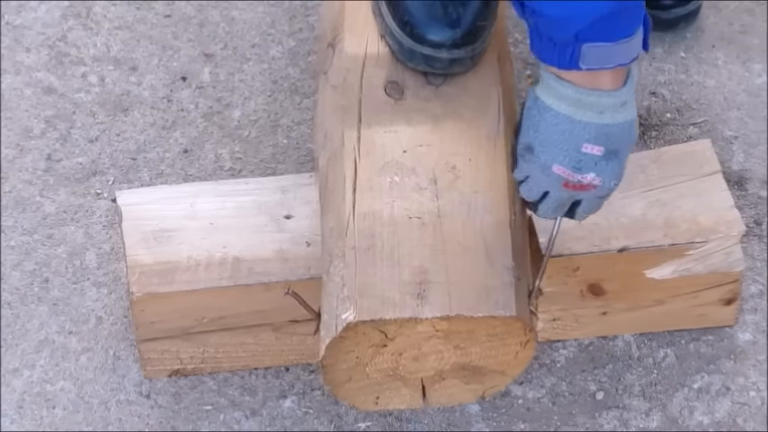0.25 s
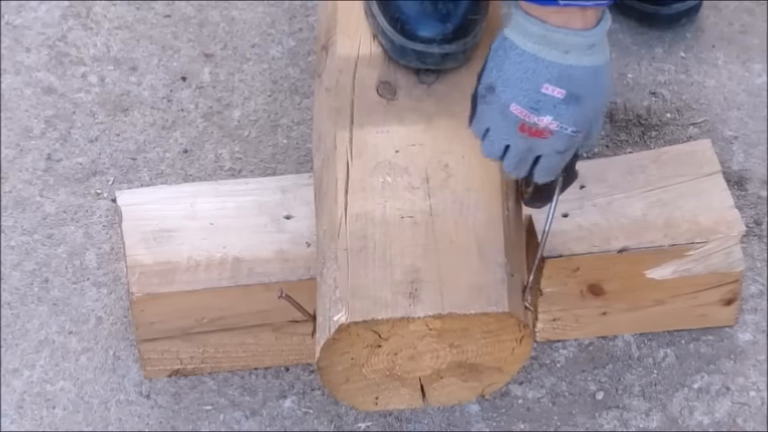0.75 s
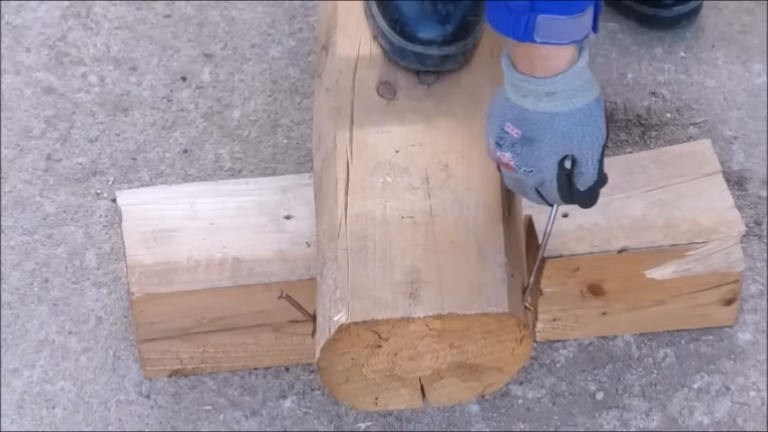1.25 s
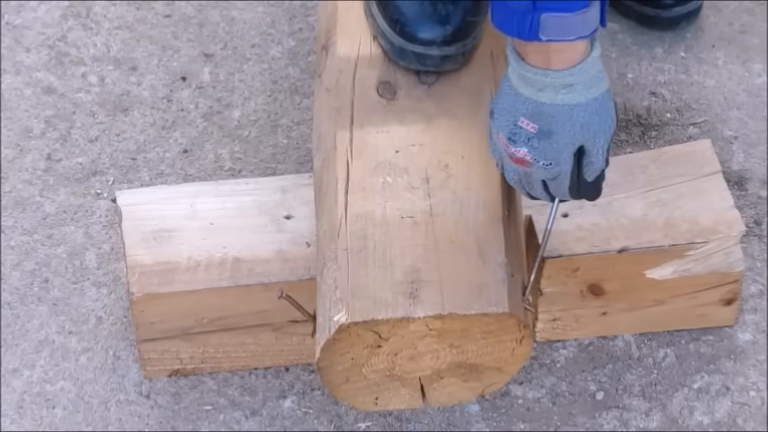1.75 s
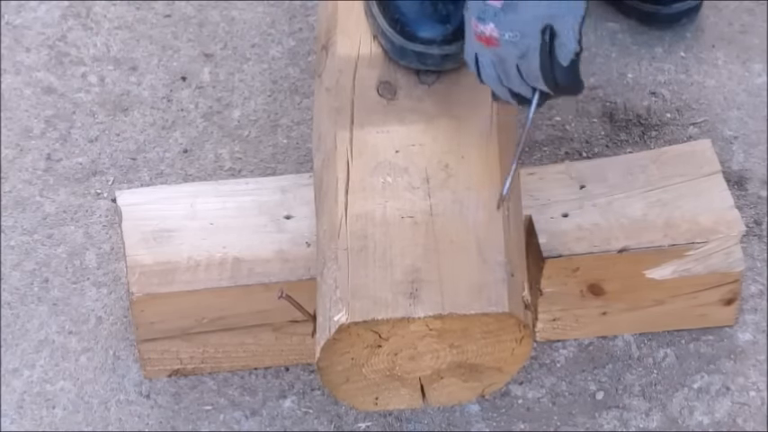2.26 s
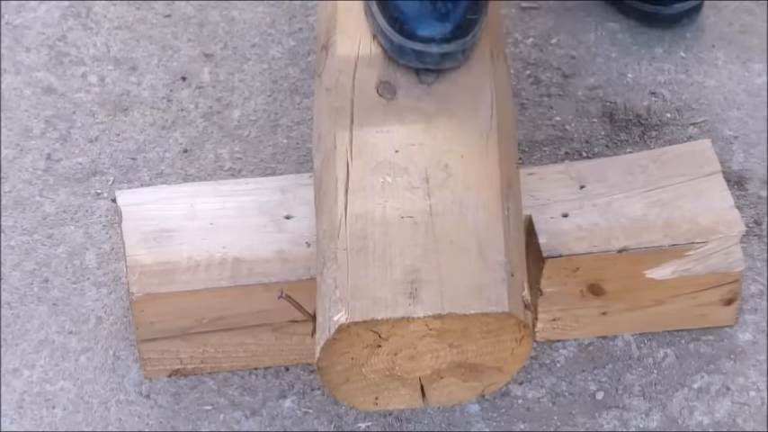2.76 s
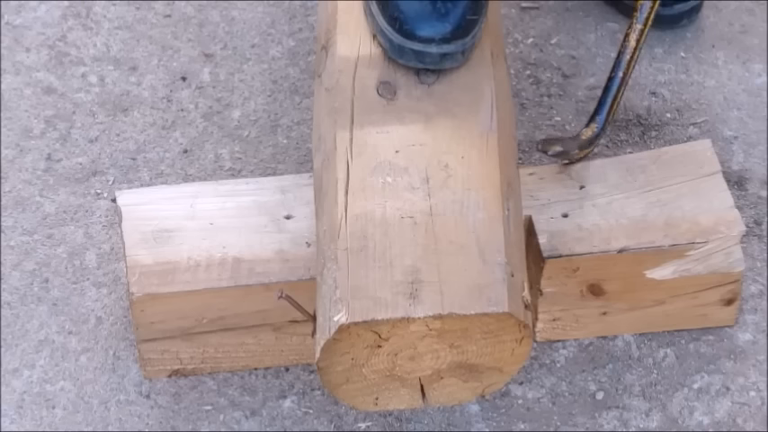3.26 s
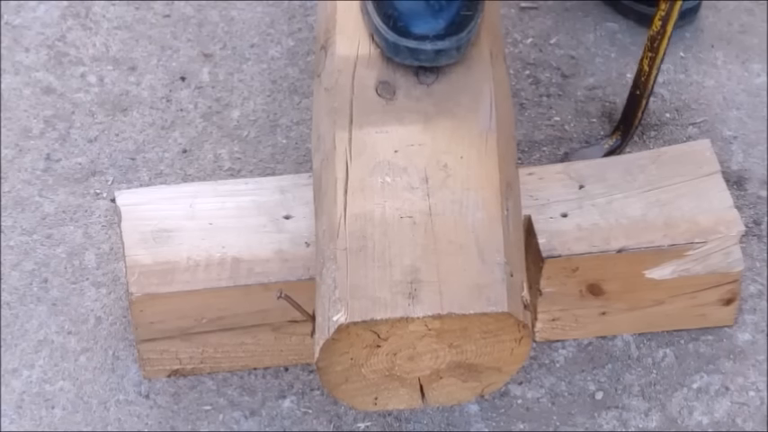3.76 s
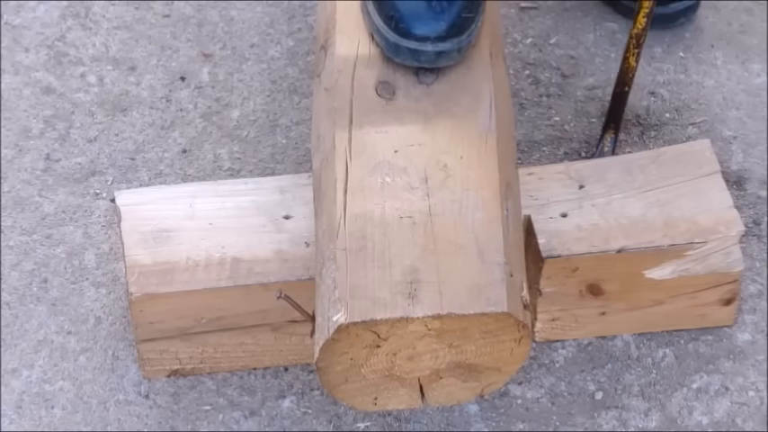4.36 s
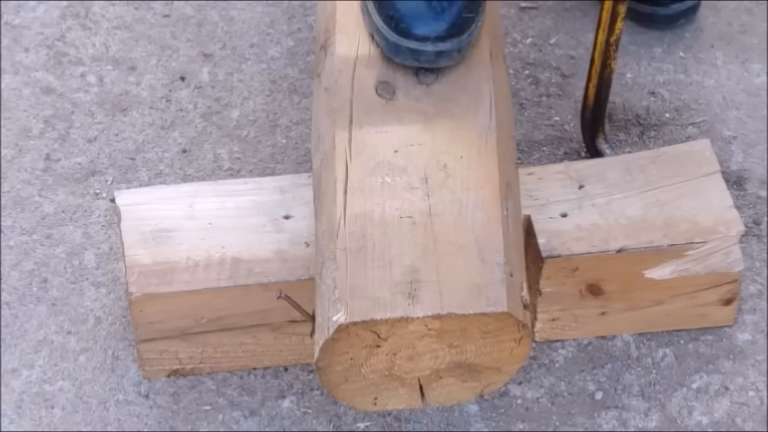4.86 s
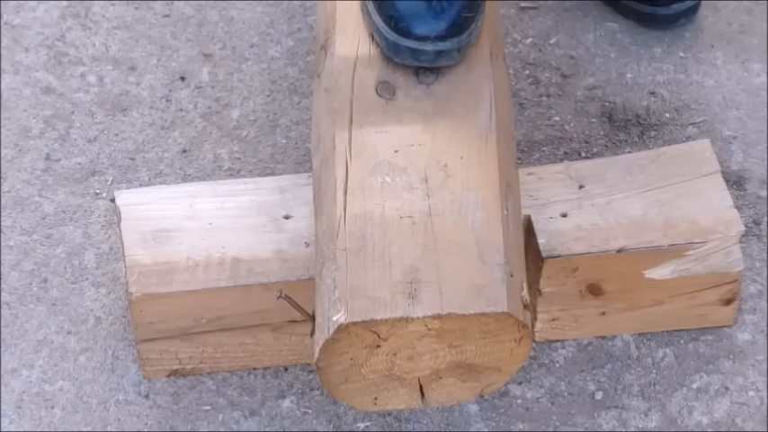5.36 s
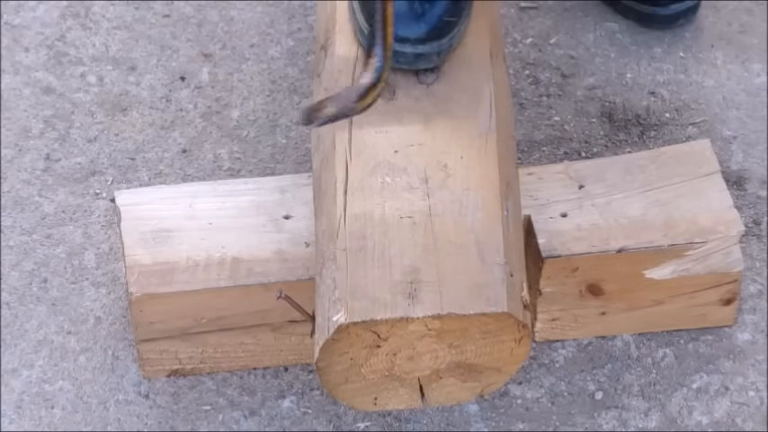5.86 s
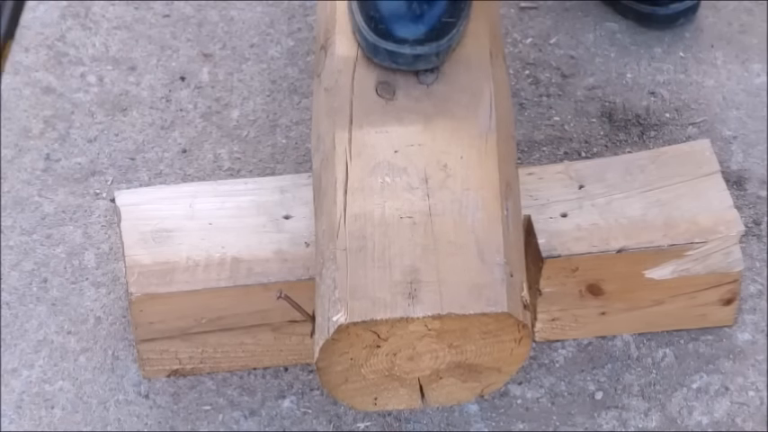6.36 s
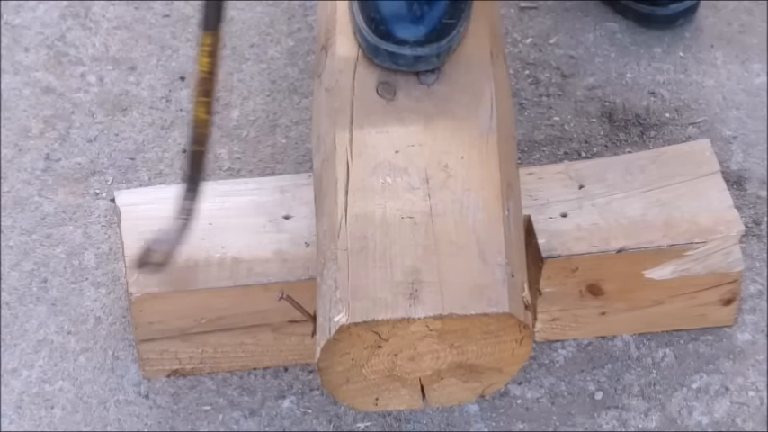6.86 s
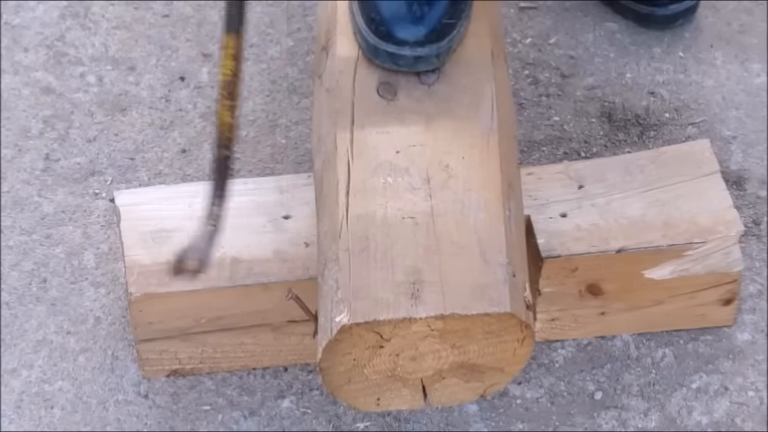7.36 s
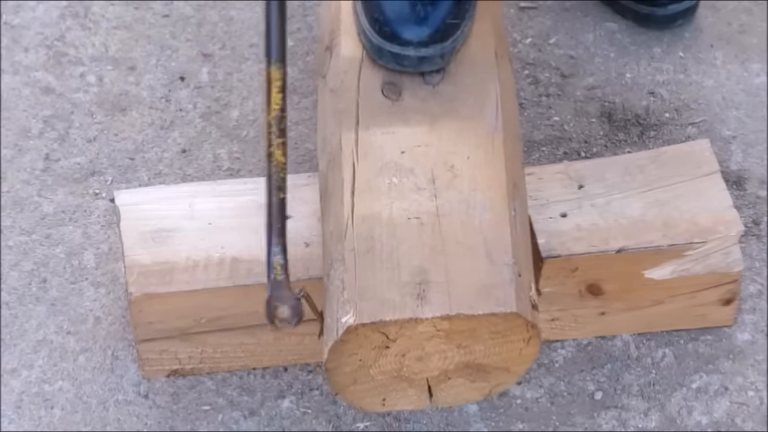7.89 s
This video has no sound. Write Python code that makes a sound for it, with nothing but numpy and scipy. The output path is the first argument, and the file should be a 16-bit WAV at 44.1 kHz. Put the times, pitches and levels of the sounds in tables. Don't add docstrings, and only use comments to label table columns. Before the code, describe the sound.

A plank scrapes over grit and knocks down, birds whistle, a steel bar clinks and clatters, then sharp heavy blows crack against timber on concrete.

```python
import sys
import numpy as np
from scipy import signal
from scipy.fft import rfft, irfft
from scipy.io import wavfile
from scipy.ndimage import uniform_filter1d

SR = 44100
rng = np.random.default_rng(int(sys.argv[2]) if len(sys.argv) > 2 else 0)


def invert_db(x):
    u = np.asarray(x, float) / 20
    return 10 ** u


def unload_wav(signal):
    wavfile.write(
        sys.argv[1],
        SR,
        np.round(np.clip(np.atleast_2d(signal).T, -1, 1) * 32767).astype(np.int16),
    )


N = 358533

# f/Hz, density level/dB
GRIT_COLOUR = [(2470, -43.5), (4200, -13), (6600, -6.5), (7500, 4), (8800, -0.5), (10500, -17),
               (13600, -52), (22000, -120)]
# f/Hz, level/dB, t60/s
HELD_BAR = [(1230, -26, .2), (1695, -28, .22), (2417, -29, .12), (3080, -26, .15), (4000, -24, .15),
            (5362, -13, .14), (5970, -22, .17), (6788, -9, .14), (7580, -9, .09), (8600, 0, .21),
            (9105, -16, .18), (9534, -7, .2), (10400, -12, .2), (11400, -28, .1)]
# f/Hz, level/dB, t60/s
DROPPED_BAR = [(3640, -13, .07), (4500, -13, .08), (5050, -10, .06), (6880, -3, .1), (7068, 0, .12),
               (7250, -4, .12), (7440, -5, .12), (7760, -6, .1), (8150, -8, .1), (8700, -11, .1),
               (10550, -19, .16), (11500, -16, .08), (12100, -20, .08), (14800, -26, .1)]


def evened(x):
    return x / np.sqrt(np.mean(x ** 2) + 1e-20)


def read(points, hz):
    f, value = np.transpose(points)
    return np.interp(np.log(hz + 1), np.log(f + 1), value)


def colour(x, points):
    size = x.shape[-1]
    gain = invert_db(read(points, np.fft.rfftfreq(size, 1 / SR)))
    return irfft(rfft(x) * gain, size)


def add(mix, s, sound):
    part = mix[:, round(s * SR):][:, :sound.shape[-1]]
    part += sound[..., :part.shape[1]]


def unroll(rows):
    s, *columns = np.transpose(rows)
    t = np.arange(s[0], s[-1], 1 / SR)
    window = signal.windows.tukey(len(t), min(1, 0.0094 / (t[-1] - t[0])))
    return s[0], window, [np.interp(t, s, column) for column in columns]


def smooth(x, size):
    for _ in range(3):
        x = uniform_filter1d(x, size)
    return x


def spread(shape, same):
    a, b = rng.standard_normal((2, shape))
    return np.array([a, same * a + np.sqrt(1 - min(same, 1) ** 2) * b])


def ringing(modes, size=12000):
    t = np.arange(size) / SR
    return sum(invert_db(db - 60 * t / min(t60, .9)) * np.sin(2 * np.pi * hz * t) for hz, db, t60 in modes)


def echoes(x, stretch):
    # f/Hz, t60/s
    wall_decay = [(200, 0.097), (1000, 0.11), (4000, 0.083), (9000, 0.11), (16000, 0.009)]
    size = SR // 2
    taps = np.zeros((2, size))
    at = np.arange(200, size - 20, 20) + rng.integers(0, 20, (2, (size - 201) // 20))
    np.put_along_axis(taps, at, rng.choice([-1., 1.], at.shape), 1)
    hz, t, z = signal.stft(taps, SR, nperseg=256)
    fade = invert_db(-60 * t / (stretch * read(wall_decay, hz)[:, None]))
    tail = signal.istft(z * fade, SR, nperseg=256)[1]
    return signal.fftconvolve(x, tail / np.linalg.norm(tail[0]), axes=1)[:, :N]


def wind():
    gusts = [(0, -47, 50, 36), (.54, -48.5, 292, 109.5), (1.12, -34, 85, 299.5), (1.74, -36, 60, 298),
             (2.65, -55, 109, 500), (3.02, -60, 102, 302.5), (3.319, -30.5, 141, 196),
             (3.56, -45, 200, 101), (3.831, -50, 31, 396.5), (4.659, -42.5, 200, 149.5),
             (5.0, -36.5, 67.5, 200), (5.15, -40, 150, 298), (5.3, -55, 107.5, 26), (6.31, -47, 400, 32),
             (6.81, -46, 103, 139.5), (7.103, -28.5, 314, 192.5), (7.26, -42, 154.5, 96),
             (8.06, -46, 38, 44)]
    # f/Hz, density level/dB
    rumble_colour = [(12, -37.5), (20, -9.5), (43, 6.5), (105, 0.5), (143, -11.5), (300, -33.5),
                     (520, -65.5), (880, -120)]
    wander = uniform_filter1d(uniform_filter1d(rng.standard_normal(N), 1500), 1500)
    lumps = invert_db(5.5 * evened(wander))
    t = np.arange(N) / SR
    level = invert_db(-86)
    for s, db, build, lull in gusts:
        level = level + invert_db(db + np.minimum(build * (t - s), lull * (s - t)))
    rumble = evened(colour(lumps * spread(N, 0.045), rumble_colour))
    return level * rumble * invert_db([[-7.5], [5.2]])


def hiss():
    # t/s, level/dB
    yard_level = [(0, -74), (2.9, -70.5), (4.2, -75.5), (4.9, -67), (5.301, -73.5), (6.7, -67),
                  (6.899, -57.5), (8.13, -56)]
    # f/Hz, density level/dB
    rustle_colour = [(120, -50), (250, -21.5), (529, -8.5), (2210, -11.5), (3970, -13), (7680, -5),
                     (9700, -17), (10800, -34), (16000, -45)]
    hz, t, z = signal.stft(colour(spread(N, 0.42), rustle_colour), SR, nperseg=512)
    patches = uniform_filter1d(rng.standard_normal(z.shape[1:]), 8, 0)
    patches = evened(uniform_filter1d(patches, 10, 1))
    rustle = signal.istft(z * invert_db(3.7 * patches), SR, nperseg=512)[1][:, :N]
    level = invert_db(np.interp(np.arange(N) / SR, *np.transpose(yard_level)))
    return level * evened(rustle) * invert_db([[-1.5], [1.5]])


def timber(s):
    # f/Hz, width/Hz, level/dB
    first_plank = [(290, 30, -14), (352, 22, -3), (490, 30, -7), (560, 35, -8), (704, 14, 3),
                   (704, 2.6, -25), (710, 2.6, -26), (950, 40, -14), (1062, 20, -9), (1064, 4, -25),
                   (1482, 26, -8.5)]
    small_block = [(243.2, 48.5, -1), (503, 90, -9), (581, 99, 3), (962, 130, 1), (1207, 350, 6),
                   (1570, 89, -3), (1819, 440, -2.5)]
    long_beam = [(207, 198, -6), (322, 34, 4), (565, 26, -3), (705, 24, -9), (921, 20, -14),
                 (1320, 45, -16), (1470, 30, -16)]
    dull_log = [(162.5, 36, -3), (300, 26, 7), (365, 110, 7), (550, 90, -1), (775, 16, -13),
                (1070, 50, -30)]
    if s < .3:
        peaks = first_plank
    elif 4 < s < 5:
        peaks = small_block
    elif s > 5 or s < 1 or 1.9 < s < 2.2:
        peaks = long_beam
    else:
        peaks = dull_log
    modes = [(hz, db + 10 * np.log10(width / 30), 2.4 / width) for hz, width, db in peaks]
    body = ringing(modes, size=30000 if s < .3 else 9000)
    return signal.lfilter(*signal.butter(N=4, Wn=1.043 * peaks[0][0], btype="high", fs=SR), body)


def grains(size, per_s, uneven_db):
    sizes = invert_db(uneven_db * np.minimum(rng.exponential(1, size), 5))
    return sizes * (rng.random(size) < per_s / SR)


def move(s, hold, grit_top_db, wood_top_db, t60, rise, rise_db):
    load = [(s, rise_db if s > 0 else 0), (s + rise, 0), (s + rise + hold, 0),
            (s + rise + hold + .7 * t60, -42)]
    body = timber(s)
    s, window, (load_db,) = unroll(load)
    n = len(window)
    grit_db = grit_top_db + load_db
    boom_db = wood_top_db + 1.3 * load_db
    clatter_db = .48 * grit_db + .52 * boom_db - 10.5
    fine_db = grit_db - 22.0 + 0.29 * (grit_db + 17.5)

    slips = signal.lfilter([1], [1, -.96], grains(n, 1500, 2.1)) + .5
    crunch = slips * spread(n, 0.14)
    # f/Hz, density level/dB
    fine_colour = [(9800, -54), (10600, 1), (12300, -4), (13200, -7), (14500, -7), (15900, -3), (16400, -59.5)]
    clatter_colour = [(1000, -34), (1500, -10.0), (2600, 1.5), (3100, -2.5), (3800, 6.0), (4500, 3.0),
                      (5200, -29.5)]
    grit = invert_db(grit_db - 2.5) * evened(colour(crunch, GRIT_COLOUR))
    grit += invert_db(fine_db) * evened(colour(crunch, fine_colour))
    clatter = invert_db(clatter_db) * evened(colour(crunch, clatter_colour))

    shaking = window * invert_db(boom_db - 1.5) * evened(slips * spread(n, 0.84))
    sound = signal.fftconvolve(shaking, body[None] / np.linalg.norm(body), axes=1)
    sound = sound * invert_db([[-1.2], [1.2]])
    if 2.7 < s < 5:
        bar = ringing(HELD_BAR if s < 4 else DROPPED_BAR, size=4000)
        dragged = signal.fftconvolve(crunch, bar[None], axes=1)
        grit = 0.85 * grit + invert_db(grit_db - 6.5) * evened(dragged[:, :n])
    side_db = 1.8 if s < .3 else 3.5
    sound[:, :n] += window * invert_db([[-side_db], [side_db]]) * grit
    sound[:, :n] += window * invert_db([[-1.3], [1.3]]) * clatter
    return s, sound


def moves():
    # start t/s, hold/s, grit level/dB, wood shaking level/dB, fade t60/s
    scrapes = [(0, .115, -10, -21, .13), (.14, .01, -29, -39.5, .45), (.31, .01, -40, -45.5, 0.24),
               (1.934, .02, -24.5, -42, .16), (1.985, 0.032, -23, -61.5, .05), (3.29, .13, -62, -53, .3),
               (3.435, .04, -45, -52, 0.1), (4.25, .045, -61.5, -85.5, .02),
               (4.59, .09, -55.5, -56.5, 0.25), (6.0, .08, -71.5, -88, .3), (6.16, 0.033, -59, -77, 0.42),
               (6.32, .03, -56, -66, 0.27), (6.44, .03, -62.5, -72.5, .3), (8.1, .015, -44, -46.5, .05)]
    landings = [(.365, .02, -55, -45, .3), (1.69, .015, -84, -40, .17), (2.765, .03, -50, -84, .3),
                (3.246, .003, -58, -33.5, .09), (3.626, .001, -45.5, -21.5, .1),
                (3.67, 0.012, -53.5, -47, .3), (4.308, .01, -23, -18.5, 0.22), (.239, .04, -12, -27, .13),
                (4.344, .03, -19.5, -24.5, .2), (4.416, .03, -26, -31, .25), (6.775, .02, -30.5, -29, .14),
                (6.83, .01, -48.5, -48.5, 0.36), (7.329, 0.0054, -22, -58, 0.27),
                (7.352, .02, -28, -26, .2), (7.886, .04, -26.5, -26, .16), (7.97, .04, -46, -37.5, 0.22),
                (8.035, .02, -41, -35, .12)]
    swings = [
        (6.692, .012, -21.5, -46, .17),
        (7.84, .004, -44, -52, .03),
        (3.59, .004, -58, -46, .03),
        (7.1, .09, -44, -80, .2),
    ]
    out = np.zeros((2, N))
    # rise/s, level at its start/dB
    for rows, rise, rise_db in ((scrapes, .014, -14.5), (landings, .004, -14.5), (swings, .045, -36)):
        for row in rows:
            add(out, *move(*row, rise, rise_db))
    return out


def blow(s, db, thud_db):
    # f/Hz, density level/dB
    crack_colour = [(290, -60.5), (500, -41), (1800, -28), (2980, -18.5), (3750, -16.5), (4940, -11.5),
                    (7860, 0), (10700, -23), (16000, -39)]
    body = timber(s)
    t = np.arange(len(body)) / SR
    crack = colour(spread(len(t), 0.8), crack_colour)
    crack = crack * invert_db(-60 * t / 0.009) * (1 - np.exp(-t / .0006))
    scatter = evened(colour(spread(len(t), .3), GRIT_COLOUR)) * invert_db(-25 - 60 * t / .1)
    thud = body * (1 - np.exp(-t / 0.007))
    parts = crack / abs(crack[:, :200]).max() + scatter + invert_db(thud_db) * thud / abs(thud).max()
    return invert_db(db) * parts * invert_db([[-2.5], [2.5]])


def blows():
    # t/s, peak level/dB, wood thud above the peak/dB
    knocks = [(0.2205, -5, -19), (0.2389, -11.5, -9.5), (0.3645, -33.5, -1.5), (1.4012, -46.5, -31.5),
              (1.693, -55.5, 31.5), (1.945, -29, -13), (3.244, -19, -2), (3.6245, -30, 12),
              (4.3071, -3.5, -12), (4.321, -10.5, -11.5), (4.3446, -3, -11.5), (4.3546, -6, -9),
              (4.3768, -14, -23), (4.416, -8.5, -8), (4.5093, -30.5, -12), (4.5741, -37.5, -8),
              (4.6743, -31, -10), (6.7472, 3, -48.5), (6.7515, 3, -38), (6.789, -22, -18),
              (1.42, -52, -31.5), (7.3291, 2.5, -43), (7.3392, -1.5, -23), (7.3519, -2.5, -31),
              (7.884, 5, -45.5), (7.9024, -9, -11.5), (7.9709, 1, -48), (7.9897, -12, -31),
              (8.0352, -23.5, -3.5)]
    out = np.zeros((2, N))
    for row in knocks:
        add(out, row[0], blow(*row))
    return out


def whistle(rows, partials, flutter, broken_db, hoarse=0.):
    s, window, (hz, db) = unroll(rows)
    tremble, flicker = rng.standard_normal((2, len(hz)))
    quick = flutter * evened(smooth(tremble, size=40))
    slow = .006 * evened(smooth(flicker[::-1], size=900))
    turns = 2 * np.pi * np.cumsum(hz * (1 + quick + slow)) / SR
    tone = np.sin(turns) + sum(invert_db(d) * np.sin(k * turns) for k, d in partials)
    tone = tone * (1 + hoarse * evened(smooth(tremble[::-1], size=16)))
    level = invert_db(db + broken_db * evened(smooth(flicker, size=400)))
    return s, np.sqrt(2) * window * level * tone


def swoop(s, rise, length, top_hz, db, rest_hz, settle, full_hz, sinking_db):
    t = np.arange(0, length, .002)
    scoop = .4
    up = 1 - (1 - scoop) * np.clip(1 - t / rise, 0, 1) ** 2.3
    high = np.exp(-(np.maximum(t - rise, 0) / settle) ** 1.25)
    hz = up * (rest_hz + (top_hz - rest_hz) * high)
    faint_db = 16 * np.minimum(np.log2(hz / full_hz), 0)
    return np.column_stack([s + t, hz, db + sinking_db * (1 - high) + faint_db])


def birds():
    # start t/s, end t/s, start f/Hz, end f/Hz, level/dB
    twitter = [(6.973, 6.999, 4480, 2850, -44), (6.968, 6.99, 9200, 5700, -44),
               (7.172, 7.192, 8900, 7300, -38), (7.175, 7.19, 10300, 8900, -48),
               (7.17, 7.2, 4300, 3500, -47.5), (7.21, 7.24, 9200, 8300, -49),
               (7.64, 7.655, 3300, 3000, -52), (7.67, 7.69, 3300, 4300, -45.5),
               (7.685, 7.72, 4300, 3700, -46), (7.7, 7.74, 3000, 4200, -52),
               (7.775, 7.795, 4400, 5600, -45.5), (7.5, 7.52, 4400, 4900, -47.5),
               (4.247, 4.3, 5600, 5100, -61), (2.736, 2.757, 6100, 4300, -55),
               (2.83, 2.86, 4500, 5300, -56.5), (2.86, 2.95, 5100, 5400, -65),
               (2.82, 2.93, 2200, 3300, -69.5), (3.04, 3.1, 7000, 7900, -57.5),
               (3.065, 3.12, 5500, 4900, -58.5), (3.06, 3.14, 2700, 2600, -68.5),
               (3.115, 3.22, 5700, 6000, -64), (3.165, 3.197, 3000, 2600, -59.5),
               (3.51, 3.6, 2600, 3200, -66), (3.69, 3.78, 5000, 5300, -61.5), (3.75, 3.86, 2800, 2900, -69),
               (1.06, 1.12, 2700, 2450, -62.5), (1.215, 1.275, 3100, 3500, -64),
               (.81, .87, 5800, 6000, -74), (5.148, 5.192, 2900, 3460, -63.5),
               (6.032, 6.118, 6570, 8500, -62), (0.32, 0.36, 6200, 7450, -42.5),
               (.365, .42, 3600, 3750, -50), (8.12, 8.13, 4700, 4900, -42), (6.1, 6.2, 2600, 2900, -66),
               (6.3, 6.45, 3000, 2700, -66)]
    # t/s, length/s, f/Hz, level/dB, octave level/dB
    chirps = [
        (0.801, .16, 3984, -50.5, -51),
        (1.649, .15, 4074, -43, -52.5),
        (3.07, 0.15, 3950, -52.5, -54),
        (5.078, 0.15, 3785, -57.5, -44.5),
        (5.36, .14, 3890, -70.5, -69),
    ]
    far_notes = [(0.973, 0.12, 3450, 50, -73), (1.241, 0.83, 4287, -89, -59),
                 (1.961, 0.17, 4090, -1100, -62.5), (2.147, 0.26, 5990, -21, -62.5),
                 (2.425, 0.27, 5595, -100, -65.5), (2.15, 0.39, 4100, -300, -73.5),
                 (2.498, .22, 3606, 197, -66.5), (2.716, 0.59, 4060, -52, -69.5),
                 (3.362, .43, 5860, 150, -65), (3.713, 0.29, 4280, -180, -71),
                 (4.021, 0.096, 4090, -550, -77.5), (5.463, 0.12, 4300, 148, -73.5),
                 (5.825, 0.19, 4040, -400, -70), (6.002, 0.15, 3615, 21, -65),
                 (6.126, 0.56, 4050, 30.5, -65.5), (6.429, 0.1, 5000, -5.5, -63)]
    # t/s, rise/s, length/s, top f/Hz, level/dB
    glides = [
        (6.773, .012, .36, 5184, -35),
        (7.134, .058, .195, 6606, -24.5),
    ]
    breaks = [
        (7.505, .122, .14, 7940, -32),
        (7.771, 0.1, .112, 7250, -34),
    ]
    # multiple of f, level/dB
    glide_partials = [
        [(.5, -29.5), (1.5, -12), (2, -21.5), (2.5, -62)],
        [(1.5, -36), (2, -36)],
    ]
    hoarse = .3
    near, far = np.zeros((2, 2, N))
    for start, end, start_hz, end_hz, db in twitter:
        note = [(start, start_hz, db), (end, end_hz, db - 0.5)]
        add(near if 6.9 < start < 7.3 else far, *whistle(note, [], 0.012, 3.6, hoarse))
    for s, length, hz, db, octave_db in chirps:
        arch = [(s, hz, db - 8.5), (s + 0.25 * length, hz, db),
                (s + .5 * length, .97 * hz, db - 5.0), (s + length, hz, db - 52)]
        add(far, *whistle(arch, [(1.5, -35.5), (2, octave_db - db)], .008, 3.5))
    for s, length, hz, drift_hz, db in far_notes:
        scoop = min(.08, length / 3)
        note = [(s, .94 * hz, db - 8.5), (s + scoop, hz, db),
                (s + length - scoop, hz + 0.57 * drift_hz, db), (s + length, hz + drift_hz, db - 8.5)]
        add(far, *whistle(note, [(1.5, -22)], .005, 3.5))
    for row, partials in zip(glides, glide_partials):
        note = swoop(*row, rest_hz=4640, settle=.05, full_hz=4780, sinking_db=3)
        add(near, *whistle(note, partials, .004, 2.4, .5 * hoarse))
    for row in breaks:
        note = swoop(*row, rest_hz=3000, settle=.009, full_hz=8100, sinking_db=-7.5)
        add(near, *whistle(note, [], .008, 3.5, hoarse))
    near[0] = np.roll(near[0], shift=12)
    near = near + invert_db(-6) * echoes(near, 2.2)
    far = far + invert_db(4.0) * echoes(far, 1.9)
    return invert_db([[-2.2], [.4]]) * near + invert_db([[-8], [-5.5]]) * far


def steel():
    # f/Hz, level/dB, t60/s
    offcut = [(1119.6, -3, 0.043), (1451, -2, 0.036), (2072, 8.5, 0.065), (2630, 10, 0.051)]
    # f/Hz, level/dB, t60/s
    resting_bar = [(1190, -3, .15), (1696, -14, .2), (2417, -8, .2), (3128, -14, .2), (3774, -14, .1),
                   (4985, -14, .2), (5701, -15, .2), (6089, -13, .2), (7547, -8, .15), (8193, -2, .2),
                   (8441, -10, .2), (8559, -5, .22), (9109, -6, .2)]
    # t/s, level/dB, brightness/dB per octave
    strikes = [
        [(2.762, -16.5, 2.5), (3.29, -52.5, -8), (3.465, -54, 2)],
        [(4.309, -11, -2.5), (4.345, -7, 2.5), (4.417, -7.5, 3), (4.576, -32, 3), (4.676, -31, -4)],
        [(7.885, -29, 19), (7.9, -14, 0.1), (8.046, -25, -23.5)],
        [(3.628, -30, 0), (3.46, -52, 0.1)],
    ]
    chatters = (.02, .045, .02, .02)
    out = np.zeros((2, N))
    t = np.arange(2000) / SR
    for modes, hits, chatter in zip((HELD_BAR, DROPPED_BAR, offcut, resting_bar), strikes, chatters):
        for s, db, bright_db in hits:
            ring = ringing([(hz, level + bright_db * np.log2(hz / 2000), t60) for hz, level, t60 in modes])
            ring = ring * (1 - np.exp(-np.arange(len(ring)) / 60.))
            rattle = rng.standard_normal((2, 2000)) * invert_db(-30 * t / chatter - [[7], [0]])
            ring = signal.fftconvolve(rattle, ring[None], axes=1)
            add(out, s, invert_db(db) * ring / abs(ring).max())
    return out


def scene():
    air = wind() + hiss() + birds()
    work = moves() + blows() + steel()
    aside = slice(round(4.2 * SR), round(5.0 * SR))
    work[1, aside] = np.roll(work[1, aside], 9)
    work = signal.sosfilt(signal.butter(N=3, Wn=120, btype="high", fs=SR, output="sos"), work)
    return work + invert_db(-14) * echoes(work, 1.1) + air


def roll_off(x):
    return signal.sosfilt(signal.butter(12, 16310, fs=SR, output="sos"), x)


def record(dry):
    return roll_off(np.clip(dry, -.96, .96))


dry = scene()
out = record(dry)
unload_wav(out)
```